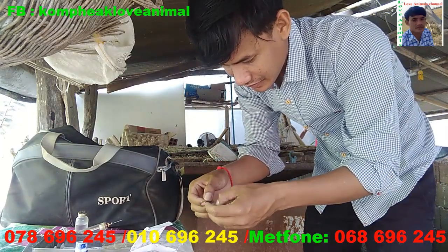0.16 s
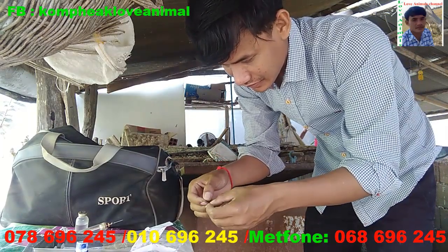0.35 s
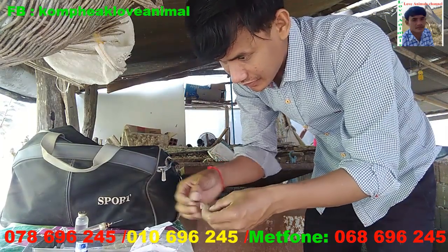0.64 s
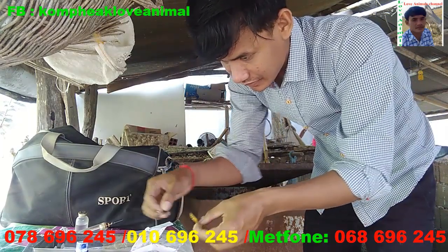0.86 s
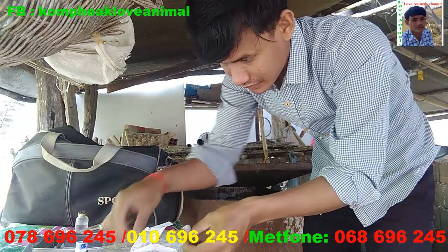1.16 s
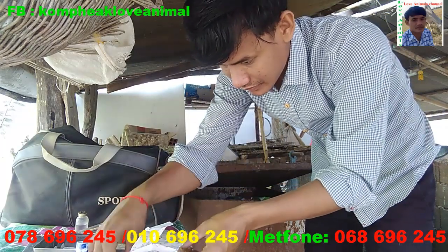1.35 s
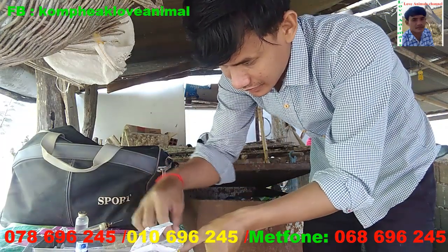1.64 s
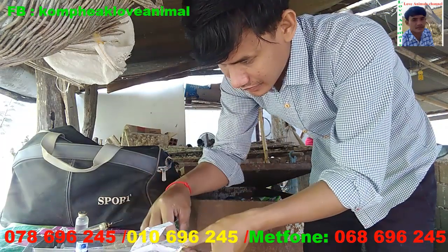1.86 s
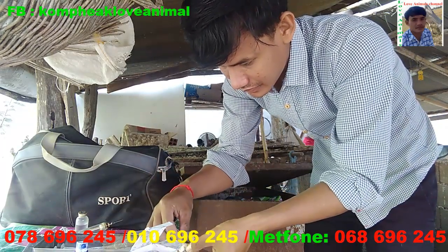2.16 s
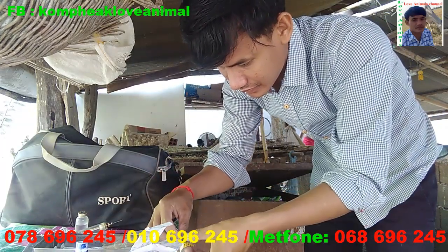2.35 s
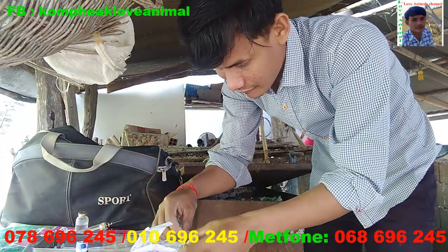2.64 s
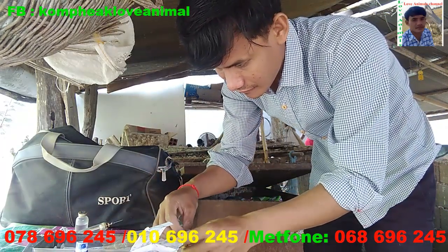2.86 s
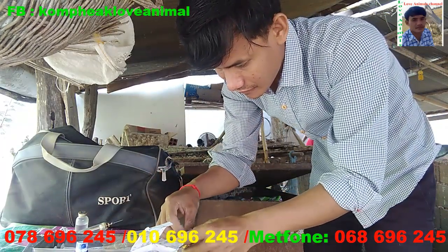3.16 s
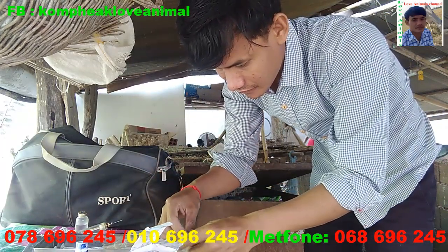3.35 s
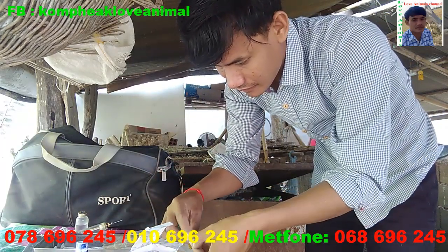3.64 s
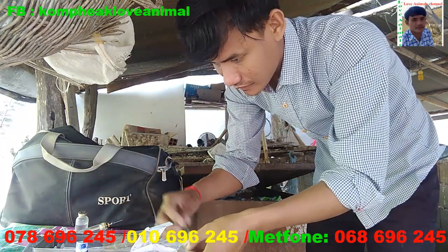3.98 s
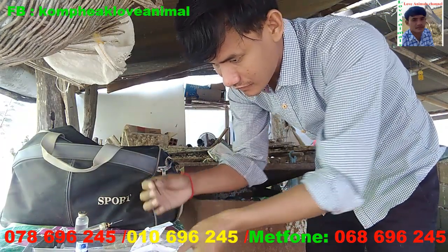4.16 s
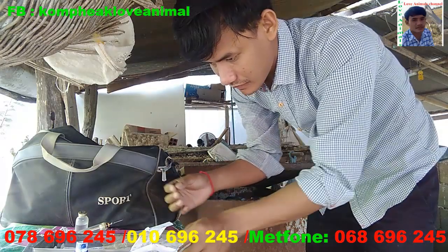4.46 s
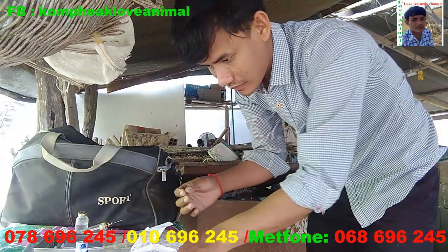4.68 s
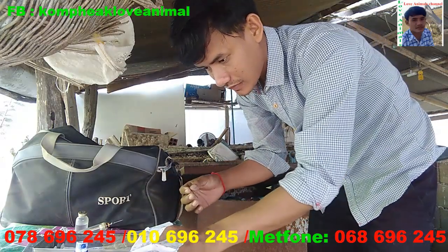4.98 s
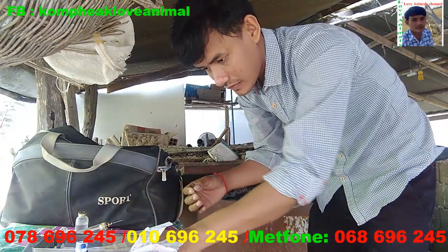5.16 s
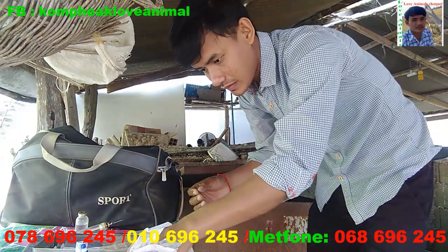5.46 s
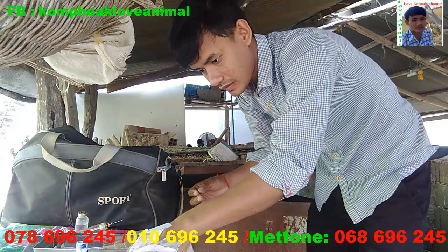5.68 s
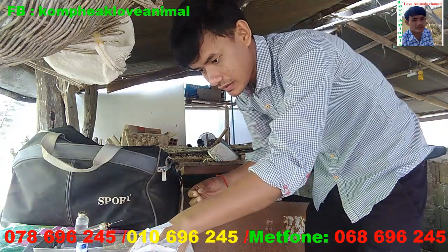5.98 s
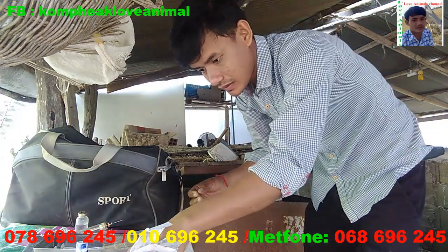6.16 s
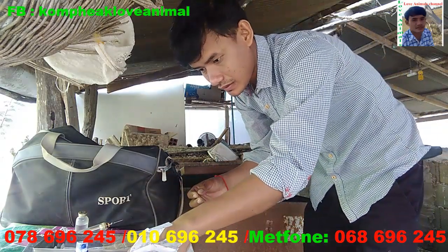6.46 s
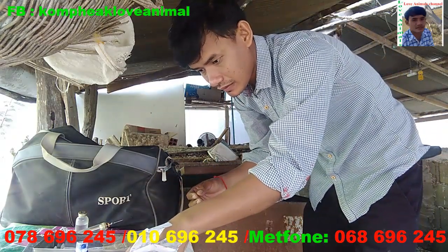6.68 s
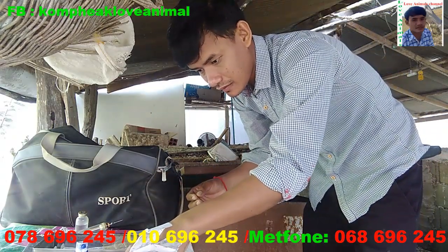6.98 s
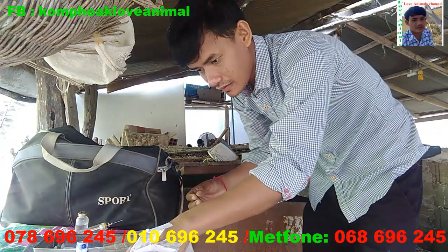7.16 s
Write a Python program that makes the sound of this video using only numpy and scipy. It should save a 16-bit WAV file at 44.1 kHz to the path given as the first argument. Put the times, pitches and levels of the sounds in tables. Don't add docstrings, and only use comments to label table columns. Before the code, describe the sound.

Close pig grunts and hoarse young pig squeals in an open shed, with chicks peeping, birds twittering, small hand clicks and faint engine hum.

```python
import sys
import numpy as np
from scipy import signal
from scipy.fft import rfft, irfft
from scipy.io import wavfile
from scipy.ndimage import uniform_filter1d

SR = 44100
rng = np.random.default_rng(int(sys.argv[2]) if len(sys.argv) > 2 else 0)


def unload_audio(sound):
    columns = np.transpose(np.atleast_2d(sound))
    steps = np.round(np.clip(columns, -1, 1) * 32767)
    wavfile.write(sys.argv[1], SR, steps.astype(np.int16))


def field_ratio(decibels):
    return 10 ** (np.asarray(decibels, dtype=float) / 20)


N = 322812

# start in seconds, length in seconds, flaps per second, speed-up in flaps/s per s.
GRUNTS = [
    (.725, .31, 28.6, 5),
    (2.955, .27, 27.4, 2.3),
    (4.304, .3, 30.2, 0),
    (5.385, .2, 26, 19),
]
# time in seconds, level in dB.
EFFORT = [
    [(.725, -31.5), (.76, -29), (.796, -28.5), (.865, -34), (.93, -36.5), (1.03, -46)],
    [(2.957, -34), (2.994, -26), (3.03, -24.5), (3.066, -27), (3.1, -31), (3.14, -45), (3.174, -30.5),
     (3.22, -59)],
    [(4.304, -27.5), (4.338, -22), (4.371, -24.5), (4.404, -21), (4.436, -26.5), (4.47, -40),
     (4.535, -41.5), (4.6, -61)],
    [(5.385, -30.5), (5.424, -22), (5.461, -20.5), (5.497, -26.5), (5.532, -35.5), (5.58, -45)],
]
# frequency in Hz, width in Hz, level in dB.
SNOUTS = [
    [(617, 270, 0), (1160, 23.6, 12.5), (1750, 150, 4), (2260, 67, 2.5), (2970, 44, -2.5), (4070, 170, -10)],
    [(511, 206, 12.5), (1182, 82, 11), (1670, 220, 8), (2020, 100, 15), (2470, 400, 8), (2950, 330, 5),
     (3500, 210, 1.5)],
    [(610, 88, -9.5), (1190, 33, 6), (1728, 51, 10), (2000, 45, 13), (2290, 110, 1), (2570, 134, 3.5),
     (3520, 150, -12.5), (4310, 65, -5)],
    [(570, 140, 3), (1086, 110, 4), (1920, 190, 9), (2910, 590, 2.5), (3540, 190, 1), (4050, 190, 1.5),
     (5400, 900, -10)],
]
# frequency in Hz, width in Hz, level in dB.
CHEST = [(96, 36, -7.5), (177, 238, 1.5), (300, 69, -0.5)]
THUMP_DB = [-39, -38.5, -38, -37]
SNAP = [6, 2, 7, 5]
# treble lost by its end in dB per octave; below zero, treble is gained.
CLOSING_DB = [-16, 0.5, 10, 17]
PUFF_S = [.0014, .004, .0016, .0016]
# time in seconds, pitch in Hz, effort in dB.
CRIES = [
    [(2.045, 601, -80), (2.101, 629.6, -28.5), (2.187, 662, -29.5), (2.222, 671, -41)],
    [(2.222, 610, -40), (2.232, 591, -35), (2.322, 630.3, -31.5), (2.332, 622.8, -32.5),
     (2.39, 593.6, -38.5), (2.414, 574, -39), (2.465, 624, -53)],
    [(2.47, 520, -54), (2.524, 574.6, -33.5), (2.544, 576, -38), (2.564, 585.6, -35), (2.584, 568.7, -33.5),
     (2.628, 553, -51), (2.67, 536, -41)],
    [(5.628, 585, -55), (5.662, 617, -30), (5.678, 639, -30.5), (5.7, 651, -29), (5.734, 659.3, -30),
     (5.766, 687, -34.5), (5.81, 686, -49)],
    [(5.82, 554, -43), (5.872, 598.6, -32.5), (5.922, 604, -31), (5.942, 562, -40), (5.985, 549, -34)],
    [(5.985, 499.3, -43), (6.053, 570, -36), (6.091, 564, -47), (6.103, 528.5, -38), (6.131, 505, -41),
     (6.155, 500.4, -44), (6.177, 503.5, -41), (6.195, 509, -50)],
    [(6.21, 500, -46), (6.28, 525.7, -37), (6.312, 537, -44), (6.328, 543, -33.5), (6.39, 495.7, -44.5),
     (6.408, 482, -56), (6.42, 501, -58)],
    [(6.505, 472.4, -44), (6.551, 515.4, -37.5), (6.585, 590.6, -40), (6.605, 595, -33),
     (6.637, 594.7, -36.5), (6.697, 558.7, -46.5), (6.745, 589, -51)],
]
# frequency in Hz, level in dB.
MOUTH = [(700, 2.5), (1000, 8), (1400, 0), (2000, -7), (2600, -23), (3200, -27.5), (6400, -26),
         (9000, -20.5), (14000, -41)]
# start in seconds, top pitch in Hz, level in dB.
HOOKS = [(0.924, 6950, -42.5), (1.017, 6830, -43.5), (1.094, 5880, -45), (1.339, 7360, -48.5),
         (1.425, 6920, -42.5), (1.502, 6160, -46), (1.661, 6400, -64), (1.741, 5530, -60.5),
         (1.942, 7180, -41.5), (2.04, 6270, -37.5), (4.183, 6465, -34), (4.27, 6360, -37.5),
         (4.551, 6800, -40.5), (4.642, 6170, -38.5), (4.729, 6210, -45), (5.035, 6430, -48.5),
         (5.809, 6070, -51), (5.909, 5400, -54), (6.003, 6370, -39), (6.08, 5800, -42.5),
         (6.831, 5620, -49), (7.111, 7400, -69)]
# start in seconds, length in seconds, first pitch in Hz, level in dB.
FALLS = [(.048, 0.035, 4440, -51), (.198, 0.015, 3400, -53), (.523, 0.011, 3500, -53.5),
         (1.208, 0.015, 3650, -50.5), (1.836, 0.042, 4490, -55), (3.466, 0.017, 3670, -48.5),
         (3.868, 0.024, 5760, -44.5), (3.956, 0.029, 5730, -50), (4.024, 0.021, 6250, -45),
         (4.045, 0.024, 4670, -47.5), (5.05, 0.026, 4000, -50.5), (6.195, 0.0222, 3710, -59),
         (6.394, 0.018, 4420, -48.5), (6.435, 0.026, 3800, -49), (7.146, 0.028, 6820, -46),
         (7.218, 0.037, 6540, -45.5), (7.244, 0.023, 4420, -51)]
# start in seconds, length in seconds, first pitch in Hz, level in dB.
RISES = [(.115, 0.019, 3250, -46), (2.498, 0.02, 3500, -48.5), (3.445, 0.021, 3700, -54.5),
         (3.497, 0.011, 3090, -44.5), (3.822, 0.025, 3005, -44.5), (3.848, 0.019, 4370, -42),
         (3.805, 0.017, 5000, -46.5), (5.246, 0.019, 3610, -54.5), (5.885, 0.024, 3650, -55),
         (6.921, 0.022, 3250, -51.5), (7.294, 0.014, 3860, -49)]
# start in seconds, length in seconds, pitch in Hz, level in dB.
LEVELS = [(.95, 0.023, 6770, -47), (1.148, 0.033, 5610, -42.5), (1.148, 0.022, 6500, -45.5),
          (1.192, 0.026, 3880, -46), (5.012, 0.0091, 5070, -49), (4.13, 0.045, 6450, -49.5),
          (.255, 0.093, 4980, -67.5), (2.66, 0.018, 3300, -61), (2.9, 0.0182, 5220, -60.5),
          (6.372, 0.021, 4490, -52.5), (6.872, 0.0079, 3500, -50.5), (7.128, 0.051, 5780, -50),
          (7.225, 0.027, 5870, -44)]
# start in seconds, length in seconds, first pitch in Hz, level in dB.
DROOPS = [
    (.355, 0.032, 3530, -58),
    (3.611, 0.03, 3500, -70),
    (3.737, 0.044, 3730, -59.5),
    (3.895, 0.026, 3600, -55.5),
]
# peak in seconds, level in dB, fading in dB per second.
HIGH_HAZE = [(.05, -42.5, 78), (.49, -55, 70), (.73, -46.5, 18), (.95, -39.5, -18.5), (1.36, -37.5, -16),
             (1.97, -37, -26), (2.5, -44.5, 64), (2.93, -51.5, 0), (3.02, -40.5, 35), (3.18, -54, 166),
             (3.46, -74, 90), (3.82, -51, -38), (4.21, -34, 14), (4.58, -37, -15), (4.85, -46, 117.5),
             (5.03, -49, 152), (5.4, -38, 59), (5.66, -36.5, 60), (5.84, -38, -29), (6.1, -55, 200),
             (6.55, -52, 29), (6.85, -57, 178), (7.15, -54, 5)]
# peak in seconds, level in dB, fading in dB per second.
LOW_HAZE = [(.04, -56, 60), (.49, -51, 34), (1.84, -58.5, 65), (2.56, -55, 32), (3.455, -72, 79),
            (3.69, -60, 51), (5.245, -66.5, 99), (6.4, -70, 62), (6.85, -61.5, 83), (7.22, -48, 20)]
# multiple of the base pitch, level in dB.
SQUEAK = [(2, -71), (3, -49), (4, -47.5), (5, -61), (6, -63)]
# start in seconds, peak in dB, pitch in Hz, ring time in seconds.
TICKS = [(0.269, -58, 436, 0.045), (0.309, -64, 1900, 0.021), (.31, -54, 6450, 0.012),
         (0.458, -52, 555, 0.058), (0.683, -50, 559, 0.25), (.69, -77, 2220, 0.049),
         (1.15, -64, 1018, 0.17), (1.155, -56, 1715, 0.071), (1.235, -60.5, 2260, 0.069),
         (2.76, -62, 2290, 0.55), (2.922, -67, 5300, 0.017), (.963, -41.5, 627, 0.069),
         (.995, -59, 585, 0.085), (3.173, -49, 6800, 0.014), (3.359, -51.5, 249.6, 0.67),
         (3.47, -63.5, 423, 0.32), (0.109, -66, 375, 0.17), (0.461, -54.5, 294, 0.079),
         (3.806, -52, 1190, 0.019), (3.99, -68, 657, 0.17), (4.19, -66, 853, 0.36),
         (4.229, -51.5, 1098, 0.14), (5.25, -68.5, 632, 0.2), (5.3, -69, 800, 1), (6.845, -70, 9200, 0.017),
         (.459, -84, 1488, 0.091), (2.459, -58.5, 279.8, 0.76), (2.7, -61.5, 300, 0.64),
         (4.4, -52.5, 249.4, 0.38), (6.3, -58, 300, .4), (6.845, -55, 4000, 0.018), (7.09, -66, 950, 0.34),
         (7.135, -63, 2000, 0.1)]
# time in seconds, pitch in Hz, level in dB.
NOTES = [
    [(2.55, 1086, -65), (2.734, 1104, -73.5), (3.3, 1072, -70.5), (3.6, 1066, -70), (3.9, 1054, -71.5),
     (4.228, 1028, -71.5), (4.35, 1160, -65)],
    [(0.22, 2857, -74), (0.5, 2905, -67.5), (0.55, 3100, -71)],
    [(0.72, 2888, -96), (0.85, 2980, -69), (1.0, 2970, -64)],
    [(2.75, 2550, -80), (2.834, 2807, -72), (3.8, 2900, -84)],
    [(4.8, 2940, -76), (5.276, 3160, -74), (5.35, 3190, -83)],
    [(7.025, 1090, -65), (7.07, 1260, -69.5), (7.13, 1130, -76)],
]
# peak in seconds, level in dB, fading in dB per second.
WASH = [(.01, -56.5, 87), (.47, -73.5, 58), (.9, -44.5, 45), (1.4, -61, 0), (2.2, -38.5, 75),
        (2.55, -54.5, 77), (3.15, -52, 112), (3.85, -63.5, -19), (4.42, -38.5, 54), (5.04, -68, 99),
        (5.48, -64.5, 60), (5.75, -41, 6), (6.62, -61, 109), (7.2, -61.5, 4)]
# frequency in Hz, level in dB per Hz.
YARD = [(15, -38), (25, -9), (93, 2.5), (131, -4.5), (309, -23), (749, -51), (1000, -29), (1310, -46.5),
        (1960, -38), (2850, -21.5), (4260, -35.5), (10300, -51), (15000, -82)]
# time in seconds, level in dB.
HUM = [(0.0, -77), (1.53, -59.5), (3.24, -41.5), (3.71, -55.5), (4.47, -45), (7.07, -52.5), (7.32, -45)]
# frequency in Hz, correlation from -1 to 1.
SAME = [(60, .96), (180, .95), (540, .45), (1400, .1), (4950, -.05)]
# delay in seconds, left gain, right gain.
ECHOES = [(.0018, 1.1, .95), (.0043, .25, -.3), (.0072, .4, .33), (.012, .15, -.2), (.015, .2, -.25)]
# frequency in Hz, 60 dB decay time in seconds.
SHED = [(100, 0.84), (500, 0.64), (1500, 0.44), (4000, 0.25), (7000, 0.35), (14000, 0.082)]
# frequency in Hz, level in dB.
GATE = [(300, -130), (1500, -102), (3500, -96), (6000, -99), (8000, -107), (14000, -105)]


def grunts():
    out, k = np.zeros(N), np.arange(12)
    settings = zip(GRUNTS, EFFORT, THUMP_DB, SNOUTS, SNAP, CLOSING_DB, PUFF_S)
    for (start, length, rate, speedup), effort, thump_db, snout, snap, shut_db, puff_s in settings:
        puffs, chance = rng.standard_normal((12, 600)), rng.standard_normal((12, 10))
        flaps = 2 * k / (rate + np.sqrt(rate ** 2 + 2 * speedup * k))
        for t, air, (deep, *odd) in zip(flaps[flaps < length], puffs, chance):
            closing_db = shut_db * (t / length) ** 4.9
            open_now = []
            for (hz, width, top_db), v in zip(snout, odd):
                mode_db = top_db + 0.87 * v - closing_db * np.log2(hz / 500)
                open_now.append((hz + 0.2 * width * v, 0.97 * width, mode_db))
            puff = 0.55 * air * np.exp(-np.arange(600) / SR / puff_s)
            puff[:3] += snap
            knock = np.convolve(ring(open_now), uniform_filter1d(puff, size=5))
            knock_db = np.interp(start + t, *np.transpose(effort)) + 4.0
            add(out, start + t, field_ratio(knock_db) * knock / abs(knock).max())
            flap_db = thump_db - 4 * (t / length) ** 1.9 + 2 * deep
            add(out, start + t, field_ratio(flap_db) * ring(CHEST))
    return out


def ring(modes):
    t = np.arange(SR // 8) / SR
    out = np.zeros(len(t))
    for k, (hz, width, db) in enumerate(modes):
        out += (-1) ** k * field_ratio(db) * width * np.exp(-np.pi * width * t) * np.sin(2 * np.pi * hz * t)
    out = -out * (1 - np.exp(-t / 0.00015))
    return out / abs(out).max()


def cry(rows):
    s, (hz, effort_db) = columns(rows)
    n, db = len(hz), effort_db.max()
    t = np.arange(n) / SR
    turns = np.cumsum(hz * (1 + .035 * wander(n, count=150))) / SR
    flutter = field_ratio(2.2 * np.clip(wander(n, count=160), -3, 1.5))
    puffs = (0.36 + np.exp(-(turns % 1) / 0.074)) * rng.standard_normal(n)
    comb = sum(np.cos(2 * np.pi * k * turns) * field_ratio(3.5 * wander(n, count=700)) for k in range(2, 9))
    rough = .55
    drive = (1 - rough) * evened(comb) + rough * evened(puffs)

    f = np.fft.rfftfreq(n, 1 / SR)
    tilt_db = 2.8 * (db + 32.5) * np.log2(np.minimum(f, 3000) / 1000 + .5)
    upper = evened(irfft(rfft(drive) * field_ratio(read(MOUTH, f) + tilt_db) * (f > 750), n))
    breath = evened(resonate(resonate(puffs, hz * .84, 180), hz * .84, 180))
    low = evened(np.sin(2 * np.pi * turns) + .3 * breath)
    second_hz = hz * 1.26
    second = evened(resonate(resonate(puffs, second_hz, 90), second_hz, 90))

    opening = np.clip(t / 0.083, 0, 1) ** 1.04
    mouth = opening * uniform_filter1d(field_ratio(effort_db), size=2000)
    chest = flutter * (field_ratio(effort_db) * low + mouth * field_ratio(-18 + 2.4 * (db + 32)) * second)
    head = np.sqrt(flutter) * mouth * field_ratio(-2.5) * upper
    pair = np.array([chest + head, np.roll(chest, 15) + np.roll(head, 8)])
    return s, field_ratio(3.5) * pair * signal.windows.tukey(n, .15)


def chirps():
    out, t = np.zeros((2, N)), np.arange(0, 0.042, 1 / SR)
    below = np.exp(-(t / 0.017) ** 1.567)
    for s, top_hz, db in HOOKS:
        add(out, s, whistle(top_hz * (1 - .38 * below - 1.096 * t), field_ratio(-15.5 * below), db))
    for rows, hz_per_s in (FALLS, -43000), (RISES, 44000), (LEVELS, -5000), (DROOPS, -25000):
        for s, length, from_hz, db in rows:
            u = np.linspace(-.1, 1.1, round(1.35 * length * SR))
            add(out, s - 0.085 * length, whistle(from_hz + hz_per_s * length * u, 1.0, db))
    return out


def whistle(hz, swell, db):
    high = hz.max() > 5250
    hoarse = 1 if high else .45
    octave_db, pan_db = (-50, 12.) if high else (-26, -1.5)
    turn = 2 * np.pi * np.cumsum(hz + 170 * hoarse * wander(len(hz), count=30)) / SR
    husk = 1 + .6 * hoarse * wander(len(hz), count=40)
    tone = np.sin(turn) + field_ratio(octave_db) * np.sin(2 * turn)
    tone = tone * husk * swell * np.hanning(len(hz)) ** 0.12
    return field_ratio(db + 2.0) * field_ratio(np.array([[.3], [-.7]]) * pan_db) * tone


def rasp(birds):
    band = signal.butter(3, [6200, 13500], "bandpass", fs=SR, output="sos")
    hiss = signal.sosfilt(band, rng.standard_normal(birds.shape))
    hiss = signal.lfilter([1], [1, -.8], hiss)
    z = signal.stft(hiss, nperseg=512)[2]
    patches = uniform_filter1d(rng.standard_normal(z.shape[1:]), size=2, axis=0)
    patches = evened(uniform_filter1d(patches, size=10, axis=1))
    hiss = signal.istft(z * field_ratio(2.5 * np.clip(patches, -3, 2)), nperseg=512)[1][:, :N]
    power = abs(uniform_filter1d(birds ** 2, size=350))
    return field_ratio(-10.5) * evened(hiss) * np.sqrt(0.41 * power + 0.47 * power.mean(0))


def haze_layer(surging, low_hz, span_hz, left_db, right_db):
    out, u = np.zeros((2, N)), np.linspace(-.5, .5, 600)
    for at, pitch, glide, side, size in rng.random((8000, 5)):
        hz = low_hz + span_hz * pitch + 2000 * (glide - .35) * u
        turn = 2 * np.pi * np.cumsum(hz) / SR
        note = field_ratio(5 * size ** 3) * np.sin(turn + 99 * size) * np.hanning(600)
        add(out[int(2 * side)], at * N / SR, note)
    return evened(out) * surges(surging, rise_db_per_s=587) * field_ratio(np.array([[left_db], [right_db]]))


def squeak():
    start_s, base_hz, fade_db_per_s = 6.535, 2094, 174
    t = np.arange(SR // 4) / SR
    out, noise = np.zeros(N), rng.standard_normal((len(SQUEAK), len(t)))
    for (k, db), v in zip(SQUEAK, noise):
        band = evened(resonate(resonate(v, k * base_hz, 470), k * base_hz, 420))
        add(out, start_s, field_ratio(db - fade_db_per_s * t) * band * np.minimum(t / 0.044, 1))
    return out


def ticks():
    out, t = np.zeros(N), np.arange(SR // 3) / SR
    for s, db, hz, t60 in TICKS:
        ragged = 1 + .6 * wander(len(t), count=120)
        turn = 2 * np.pi * np.cumsum(hz * (1 + .04 * wander(len(t), count=200))) / SR
        onset = np.minimum(t * hz, 1)
        add(out, s, field_ratio(db - 60 * t / t60) * ragged * np.sin(turn) * onset)
    return out


def far_notes():
    out = np.zeros(N)
    for rows in NOTES:
        s, (hz, db) = columns(rows)
        n = len(hz)
        fading = field_ratio(9 * np.minimum(wander(n, count=1000), .6))
        tone = np.sin(2 * np.pi * np.cumsum(hz * (1 + 0.0116 * wander(n, count=300))) / SR)
        add(out, s, field_ratio(db + 5) * fading * tone * signal.windows.tukey(n, .1))
    return out


def wash():
    band = signal.butter(2, [380, 2500], "bandpass", fs=SR, output="sos")
    noise = evened(signal.sosfilt(band, rng.standard_normal((2, N))))
    return ports(*noise) * surges(WASH, rise_db_per_s=114.5) * field_ratio(-2.5 + 3.5 * wander(N, count=600))


def yard():
    hz = np.fft.rfftfreq(1024, 1 / SR)
    a, b, patches = rng.standard_normal((N // 256 + 5, 2, 513, 3)).T
    patches = evened(uniform_filter1d(uniform_filter1d(patches[:, :1], 10, 0), 16, 2))
    patches_db = 6 * np.clip(hz / 600, 0, 1)[:, None, None] * np.clip(patches, -3, 1.1)
    z = (a + 1j * b) * field_ratio(read(YARD, hz)[:, None, None] + patches_db)
    air = evened(signal.istft(z.transpose(1, 0, 2), nperseg=1024, noverlap=768)[1][:, :N])
    return field_ratio(-57 + 1.5) * ports(*air) + engine()


def engine():
    t = np.arange(N) / SR
    beats = np.cumsum(20.0 * (1 + 0.065 * wander(N, count=3000))) / SR
    firing = np.diff(np.floor(beats), prepend=0) * (1 + 0.29 * wander(N, count=900))
    throb = evened(resonate(resonate(firing, 90.0, 16.3), 96, 46))
    rush = evened(resonate(resonate(rng.standard_normal(N), 88.0, 35), 107.0, 71))
    level_db = np.interp(t, *np.transpose(HUM)) - 8.5
    return field_ratio(level_db) * evened(throb + 0.19 * rush)


def near(x):
    taps = np.zeros((2, SR // 40))
    taps[1, 0] = taps[0, 7] = 1
    for s, left, right in ECHOES:
        taps[:, round(s * SR)] += left, right
    left, right = ports(*signal.oaconvolve(x[None], taps, axes=1)[:, :N])
    return np.array([np.roll(left, 6), right])


def shed(x):
    taps = np.zeros((2, SR))
    at = np.arange(300, SR - 20, 20) + rng.integers(0, 20, (2, (SR - 301) // 20))
    np.put_along_axis(taps, at, rng.choice([-1., 1.], at.shape), 1)
    hz, t, z = signal.stft(taps, SR, nperseg=512)
    t60 = read(SHED, hz)[:, None]
    tail = signal.istft(z * field_ratio(-60 * t / t60) / np.sqrt(t60), SR, nperseg=512)[1]
    tail = tail / np.linalg.norm(tail[0])
    return ports(*signal.fftconvolve(x * np.ones((2, 1)), tail, axes=1)[:, :N])


def ports(left, other):
    same = np.clip(read(SAME, np.fft.rfftfreq(N, 1 / SR)), -1, 1)
    right = irfft(same * rfft(left) + np.sqrt(1 - same ** 2) * rfft(other), N)
    return np.array([left, right])


def surges(rows, rise_db_per_s):
    t = np.arange(N) / SR
    power = np.zeros(N)
    for s, db, fade in rows:
        drop_db = np.where(t < s, rise_db_per_s * (s - t), fade * (t - s) + 90 * (t - s) ** 2)
        power += field_ratio(db - drop_db) ** 2
    return np.sqrt(power)


def resonate(x, hz, width):
    turn = np.exp(2j * np.pi * np.cumsum(hz * np.ones(x.shape[-1])) / SR)
    r = np.exp(-np.pi * width / SR)
    return 2 * (turn * signal.lfilter([1 - r], [1, -r], x / turn + 1e-18)).real


def wander(n, count):
    return evened(uniform_filter1d(uniform_filter1d(rng.standard_normal(n), count), count))


def evened(x):
    return x / np.sqrt(np.mean(x ** 2) + 1e-20)


def read(points, hz):
    f, value = np.transpose(points)
    return np.interp(np.log(hz + 1), np.log(f + 1), value)


def columns(rows):
    s, *cols = np.transpose(rows)
    t = np.arange(s[0], s[-1], 1 / SR)
    return s[0], [np.interp(t, s, c) for c in cols]


def add(mix, s, sound):
    part = mix[..., round(s * SR):][..., :sound.shape[-1]]
    part += sound[..., :part.shape[-1]]


def scene():
    sow = grunts()
    piglet = np.zeros((2, N))
    for rows in CRIES:
        add(piglet, *cry(rows))
    birds, far, small = chirps(), far_notes(), ticks()
    treble = signal.butter(2, 4300, "highpass", fs=SR, output="sos")
    birds = birds + rasp(signal.sosfilt(treble, birds))
    haze = haze_layer(HIGH_HAZE, low_hz=3710, span_hz=3223, left_db=-7.5, right_db=-10.5)
    haze = haze + haze_layer(LOW_HAZE, low_hz=3343, span_hz=2050, left_db=-1.8, right_db=-0.5)

    wet = field_ratio(-10) * piglet[0] + field_ratio(-4) * sow + field_ratio(-8) * haze
    wet = wet + field_ratio(-3.5) * birds.mean(0) + field_ratio(2.0) * far + field_ratio(3.0) * small
    direct = field_ratio(-0.5) * near(sow) + field_ratio(-5) * piglet + field_ratio(-2.5) * birds
    direct = direct + field_ratio(-3.0) * far + field_ratio(3.0) * small
    return direct + shed(wet) + squeak() + field_ratio(-4) * haze + rasp(haze) + wash() + yard()


def top_cut(x):
    return signal.sosfilt(signal.butter(12, 15510, fs=SR, output="sos"), x)


def record(dry):
    x = signal.sosfilt(signal.butter(4, 62, "highpass", fs=SR, output="sos"), dry)
    x = signal.sosfilt(signal.butter(8, 15200, fs=SR, output="sos"), x)
    hz, t, z = signal.stft(x, SR, nperseg=2048)
    power = (abs(z[:, :1024]) ** 2).mean(0).reshape(128, 8, -1).mean(1)
    band_db = 10 * np.log10(power + 1e-20)
    around_db = 10 * np.log10(abs(uniform_filter1d(power, size=15, axis=0)) + 1e-20)
    centre = hz[4:1024:8, None]
    masked_db = around_db - np.where(centre > 8000, 2, 11)
    limit_db = np.maximum(read(GATE, centre), np.where(centre > 2500, masked_db, -200))
    z[:, :1024] *= np.repeat(np.where(band_db < limit_db, field_ratio(-22), 1), 8, axis=0)
    mix = signal.istft(z, SR, nperseg=2048)[1][:, :N]
    return top_cut(mix)


dry = scene()
out = record(dry)
unload_audio(out)
```